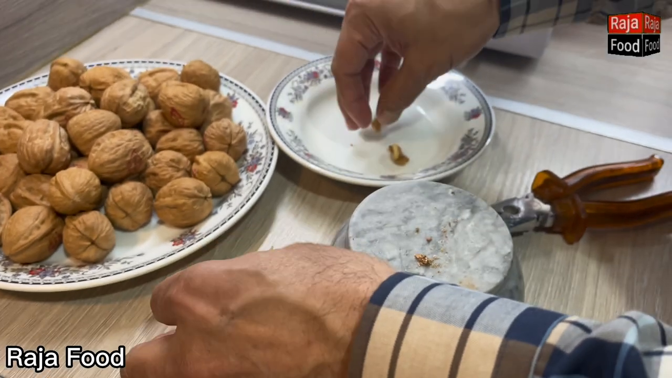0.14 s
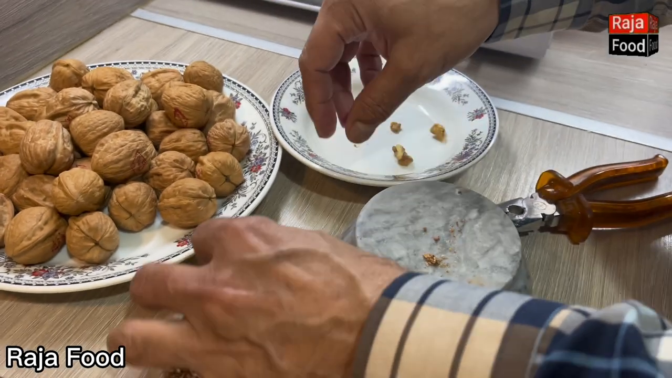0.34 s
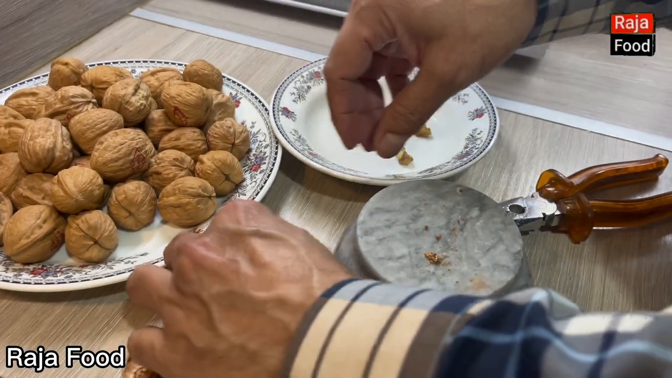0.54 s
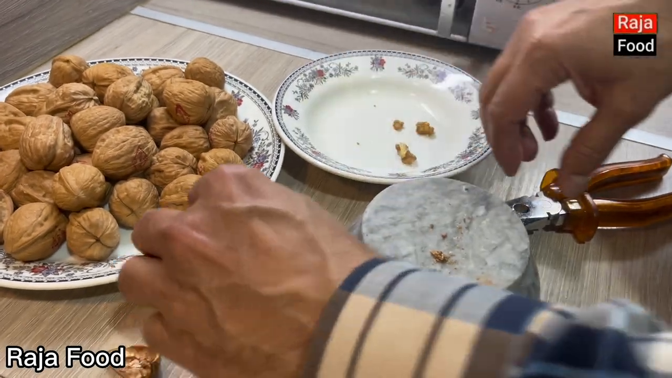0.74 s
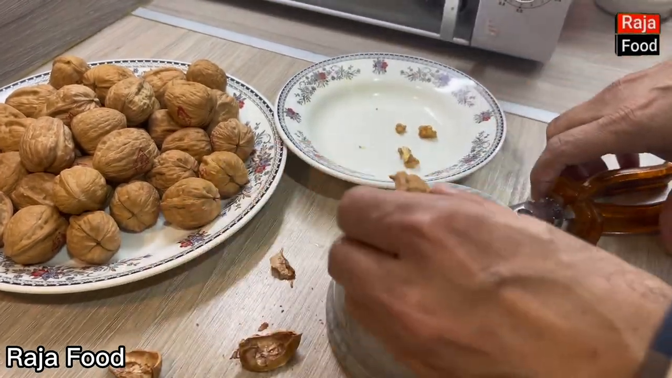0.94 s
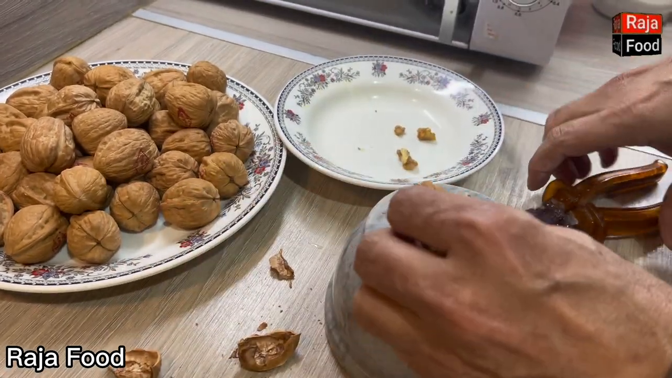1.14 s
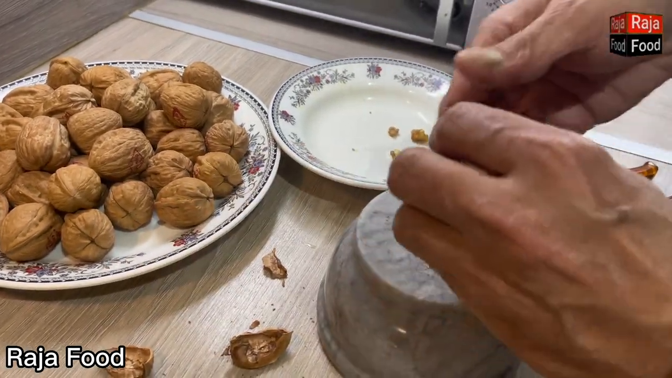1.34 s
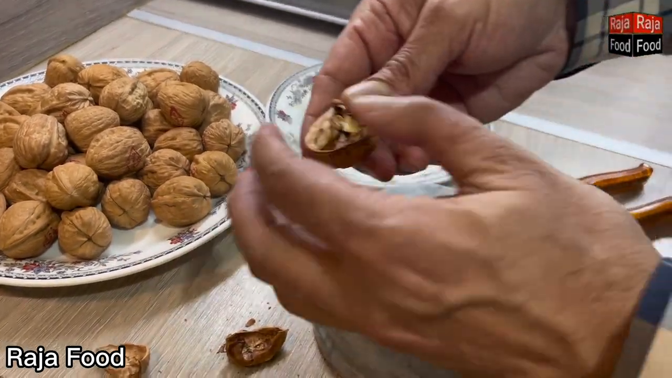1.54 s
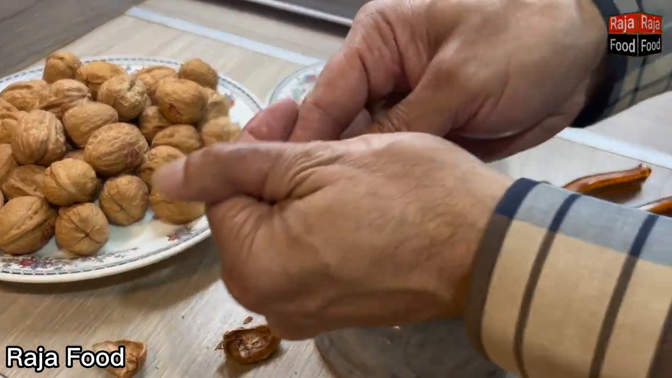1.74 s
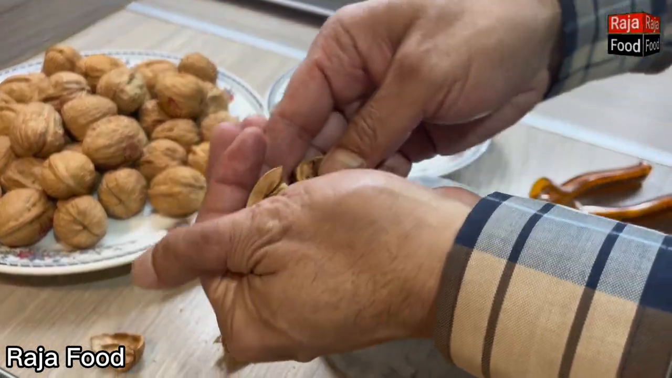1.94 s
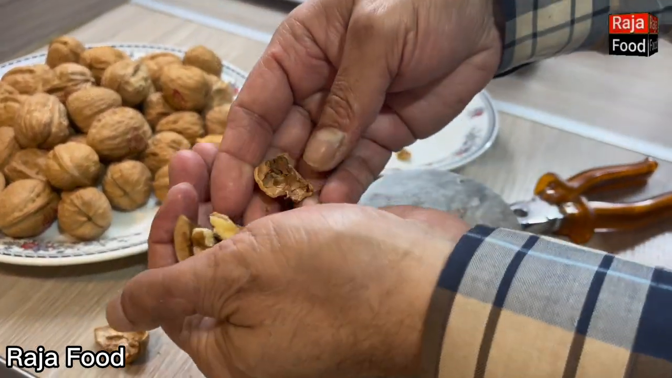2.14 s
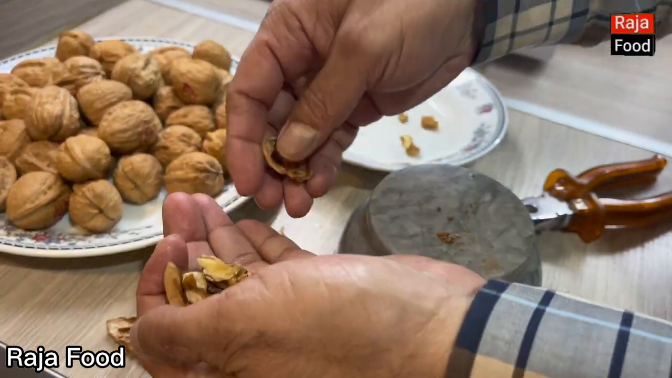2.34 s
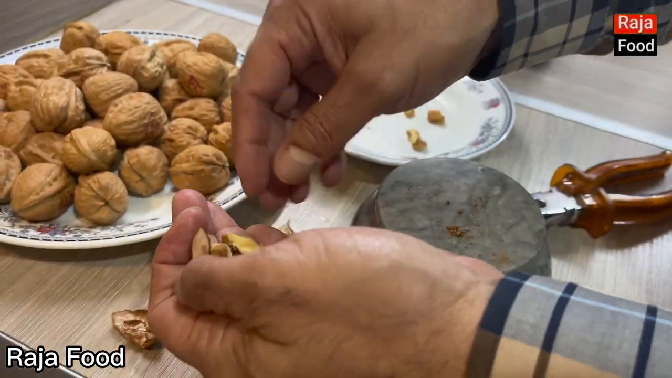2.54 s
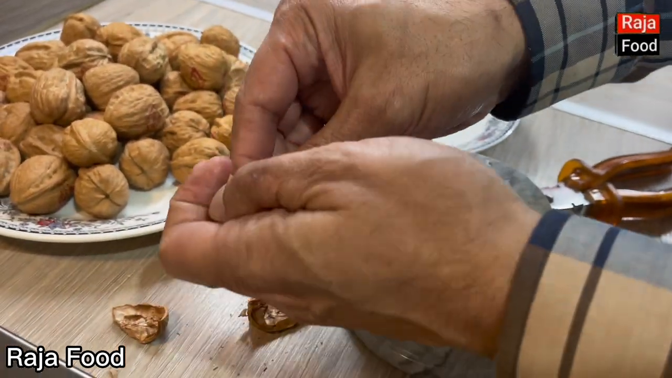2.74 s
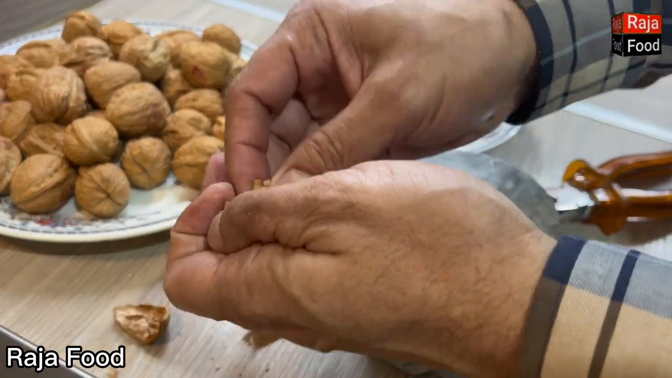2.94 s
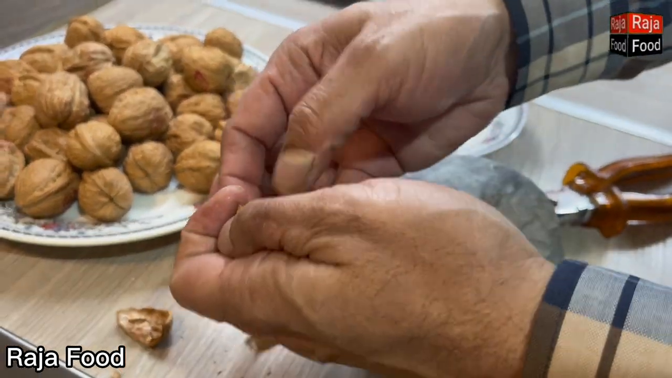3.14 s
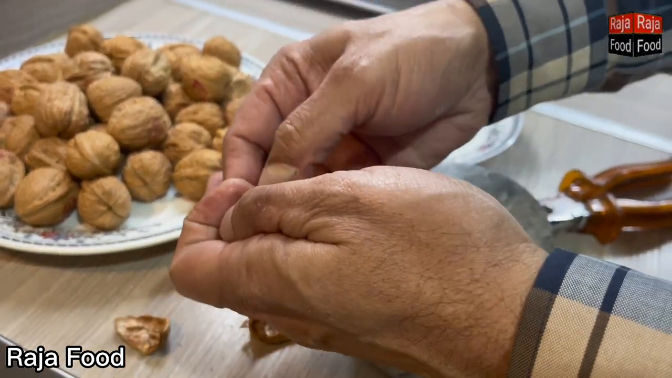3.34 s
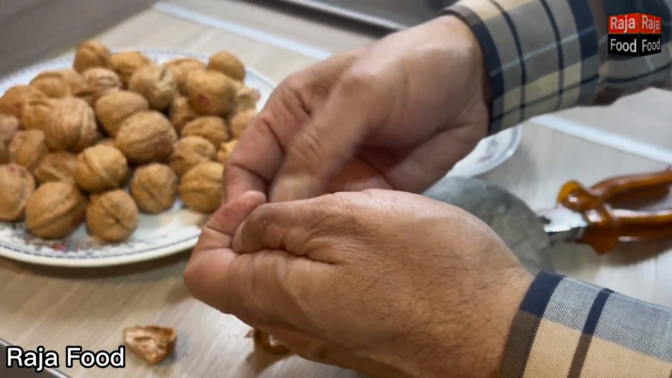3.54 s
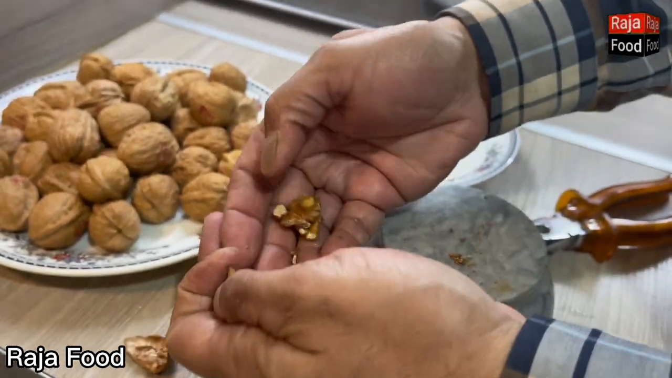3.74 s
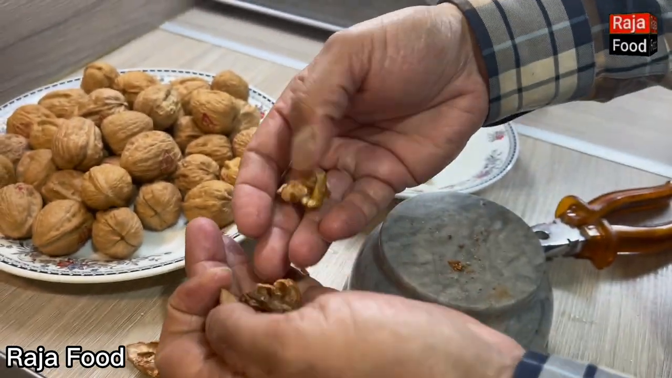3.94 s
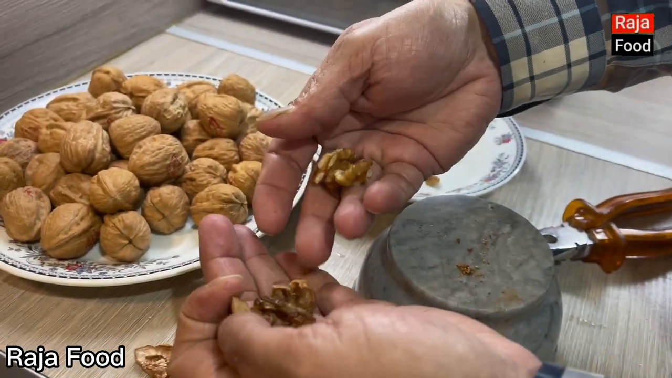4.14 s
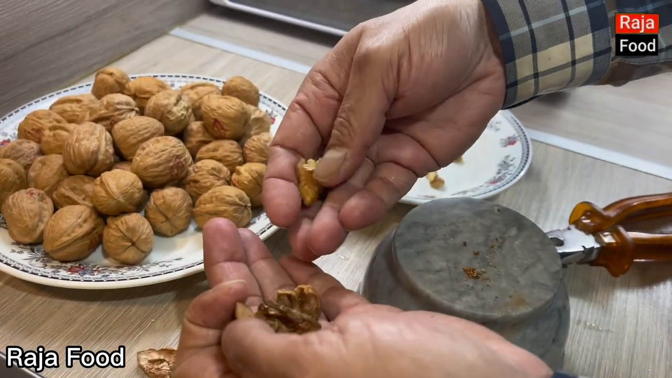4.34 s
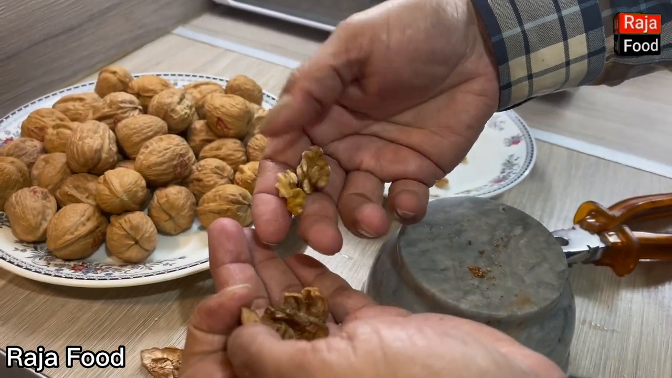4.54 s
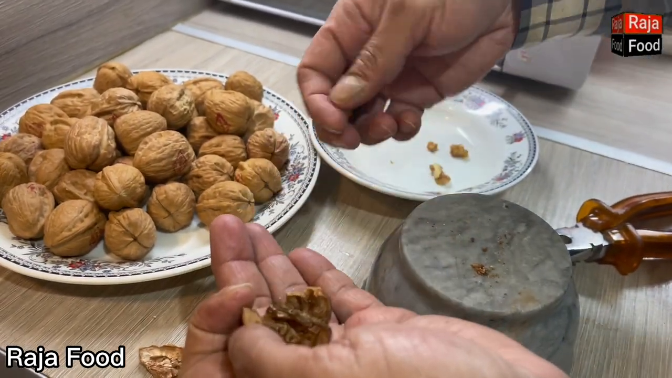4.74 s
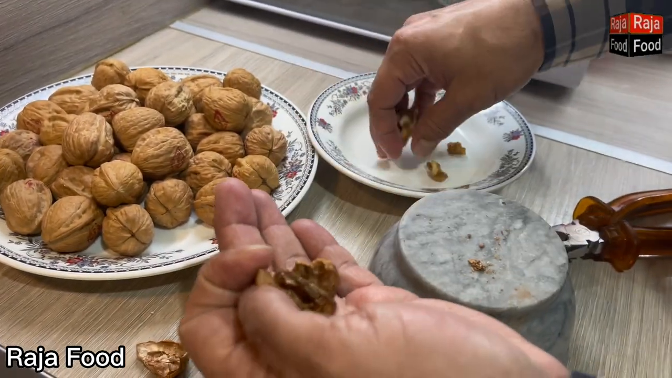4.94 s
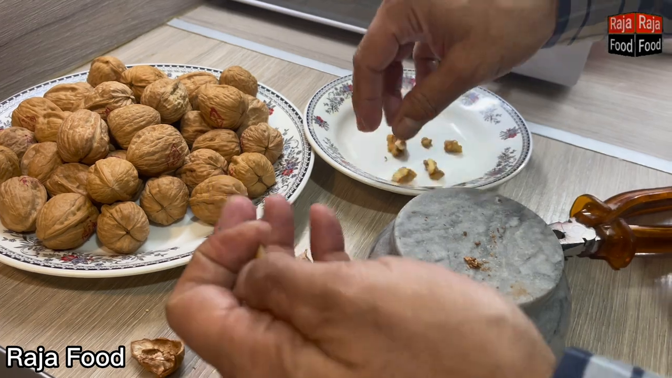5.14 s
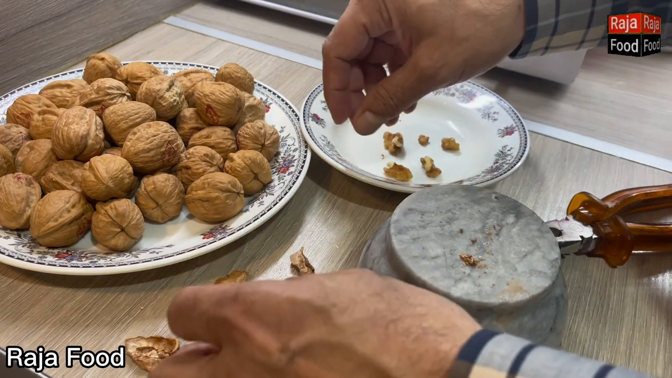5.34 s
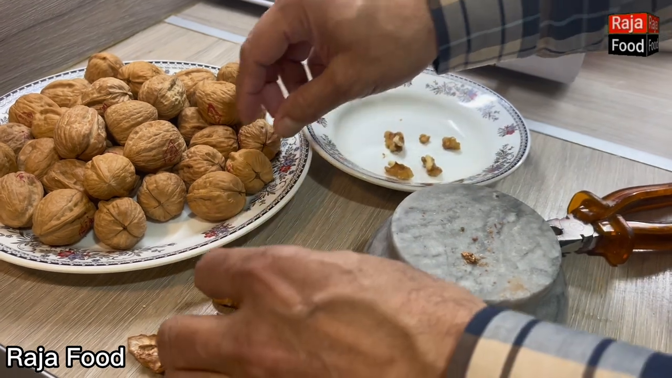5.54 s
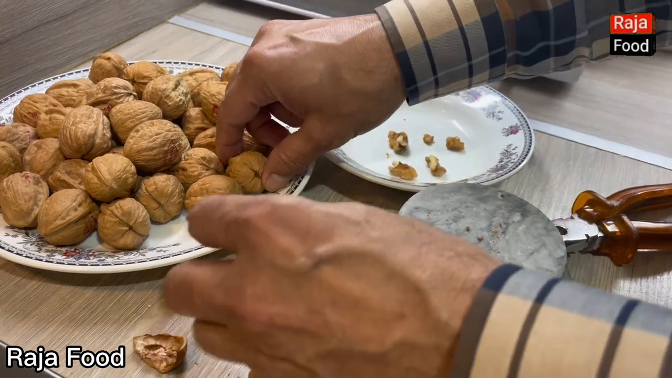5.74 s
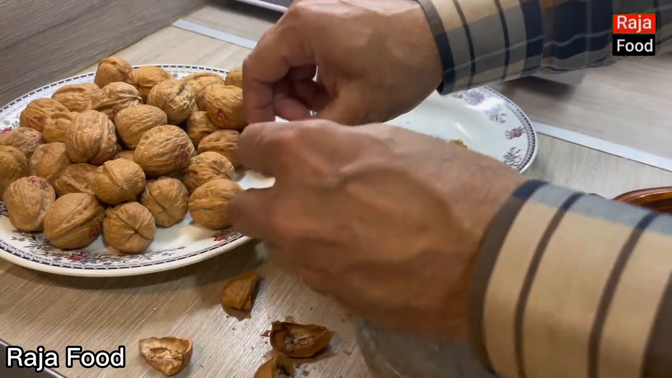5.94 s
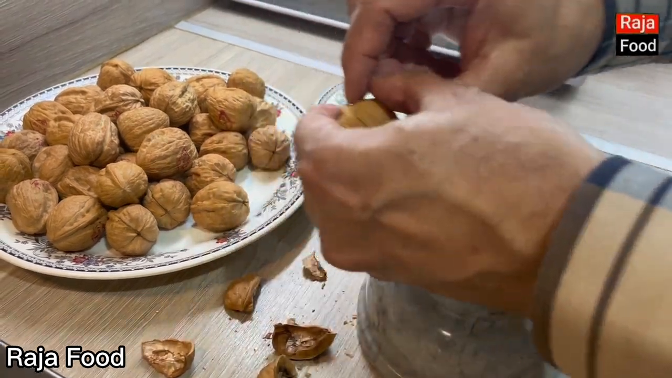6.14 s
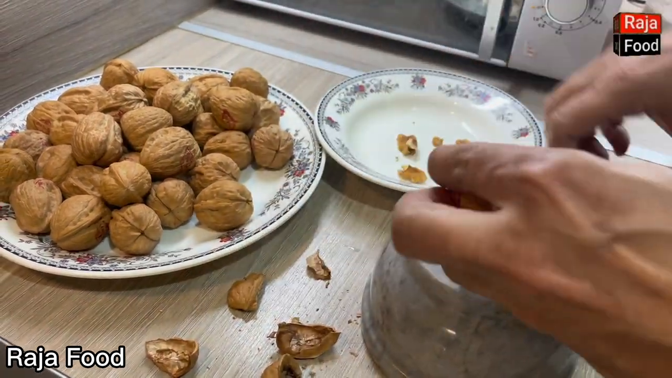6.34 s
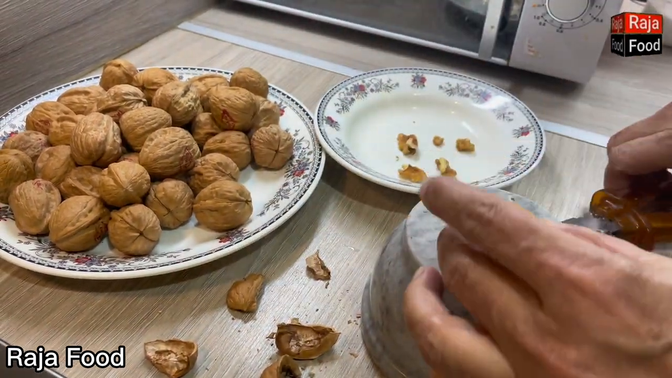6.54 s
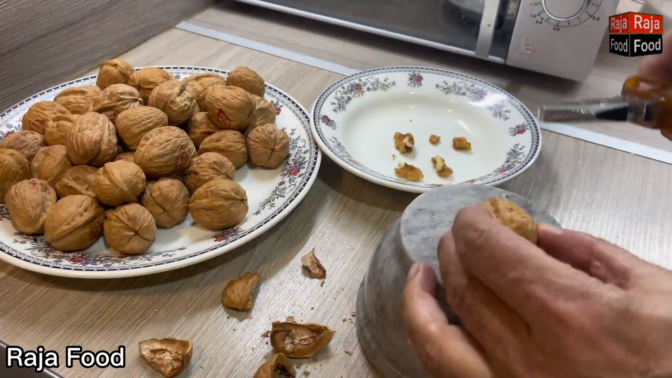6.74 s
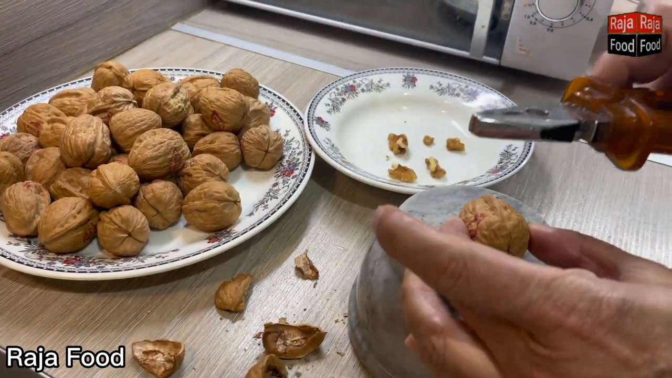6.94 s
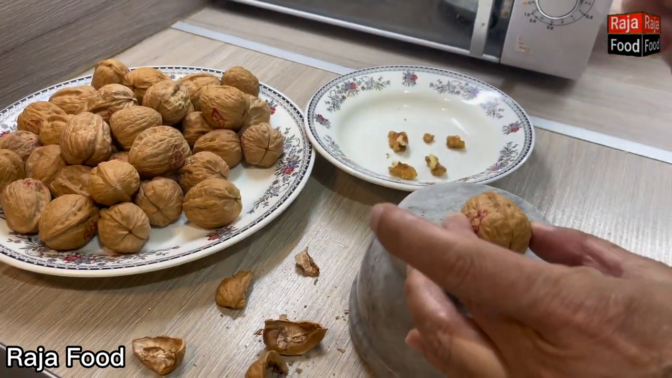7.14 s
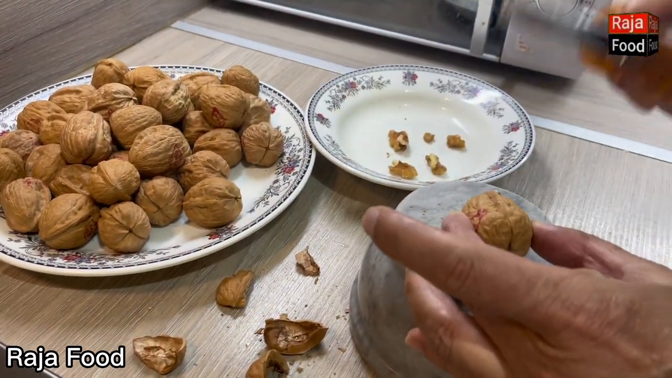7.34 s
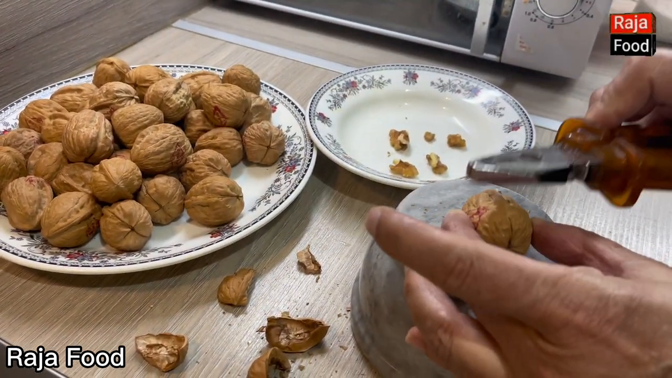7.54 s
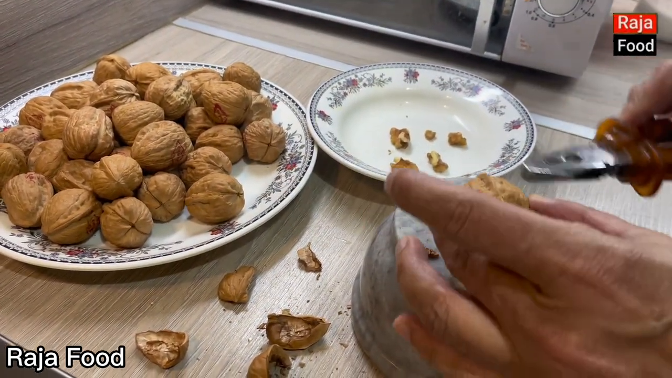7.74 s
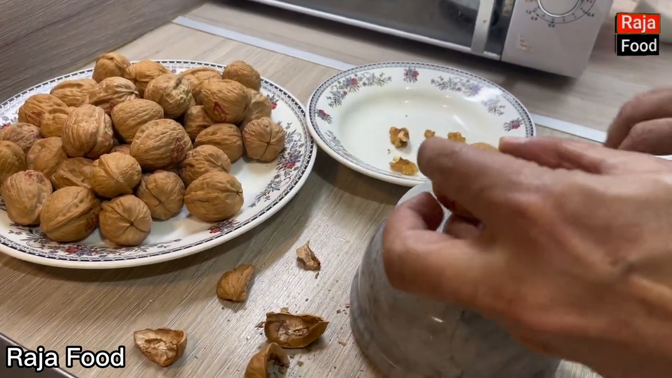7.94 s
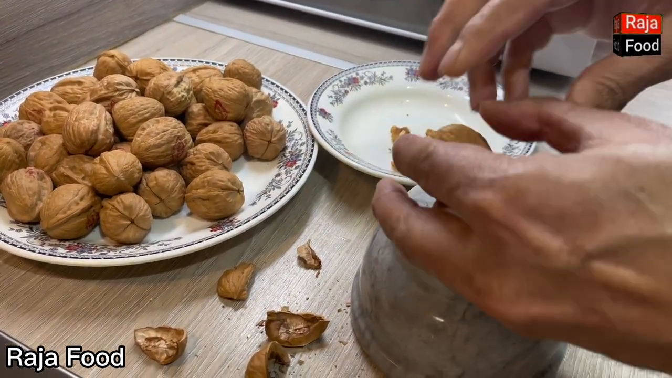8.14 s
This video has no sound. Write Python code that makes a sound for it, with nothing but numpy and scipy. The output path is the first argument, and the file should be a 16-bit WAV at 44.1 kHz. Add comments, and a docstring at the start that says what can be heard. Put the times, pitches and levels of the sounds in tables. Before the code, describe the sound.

Walnut kernels drop into a china plate, shell bits clatter, fingers snap shells quietly, then pliers knock a nut hard on stone with sharp cracks.

```python
"""A kitchen counter: walnuts are knocked open with pliers on an upturned stone mortar.
Each blow is noise bursts driving counter and stone modes, the nut's hollow and a splintering crack; steel jaws ring.
Kernels drop into a china plate, shell pieces clatter onto the counter, fingers snap them, and soft rubs pass,
all as bursts through resonators; the shuffling is filtered noise. A china tink and a soft gliding tone join in.
Below hums a quiet room, of narrow-band noise."""
import sys
import numpy as np
from scipy import signal
from scipy.io import wavfile
from scipy.ndimage import uniform_filter1d

SR = 44100
rng = np.random.default_rng(int(sys.argv[2]) if len(sys.argv) > 2 else 0)


def output_pcm(signal):
    """Save a mono or channel-first signal as 16-bit PCM at the path in sys.argv[1].

    Samples are clipped to [-1, 1] before scaling.
    """
    pcm = np.clip(np.atleast_2d(signal).T, -1, 1) * 32767
    wavfile.write(sys.argv[1], SR, np.round(pcm).astype(np.int16))


N = 361179

# modes of the counter: (frequency [Hz], relative level [dB], t60 [s])
COUNTER_MODES = [(105, -9.5, 0.98), (143, -0.5, 0.12), (227.5, 5, 0.051), (274, -11.5, 0.084),
                 (337, 2.5, 0.037), (477, -5, 0.033)]
# modes of a shell piece: (frequency [Hz], relative level [dB], t60 [s])
SHELL_MODES = [(840, -4.5, 0.019), (1685, 7.5, 0.0011)]

LEAD_S, AFTER_S = 0.06, 0.3   # span of an event before and after its peak
KNOCK_PAN_DB = -0.5   # left-right, shared by nut and jaws


def from_db(db):
    """Logarithmic level: decibels become an amplitude ratio."""
    return 10 ** (np.asarray(db) / 20)


def rms_one(x):
    """Power normalisation: scale to an rms of 1."""
    return x / np.sqrt(np.mean(x ** 2) + 1e-20)


def in_time(rows):
    """Linear interpolation: table columns become sample-rate curves."""
    s, *columns = np.transpose(rows)
    return [np.interp(np.arange(N) / SR, s, column) for column in columns]


def cut(x, hz, kind):
    """Butterworth filtering: a second-order low- or high-pass."""
    return signal.sosfilt(signal.butter(2, hz, kind, fs=SR, output="sos"), x)


def band(x, low_hz, high_hz):
    """Butterworth filtering: a band-pass."""
    return cut(x, [low_hz, high_hz], "band")


def resonance(x, hz, width_hz):
    """Damped resonance: a pole pair with a gain of about 1 at its peak."""
    r = np.exp(-np.pi * width_hz / SR)
    poles = [1, -2 * r * np.cos(2 * np.pi * hz / SR), r * r]
    return signal.lfilter([(1 - r * r) / 2, 0, (r * r - 1) / 2], poles, x)


def ring(force, modes):
    """Modal superposition: a force excites every mode, with a new strength for each event and port."""
    out = 0
    for hz, level_db, t60 in modes:
        r = from_db(-60 / (t60 * SR))
        w = 2 * np.pi * hz / SR
        event_db, port_db = rng.normal(0, 2.5), rng.normal(0, 1.5, (2, 1))
        gain = from_db(level_db + event_db + port_db)
        poles = [1, -2 * r * np.cos(w), r * r]
        out = out + gain * signal.lfilter([np.sin(w) / 2, 0, -np.sin(w) / 2], poles, force) / w
    return out


def grains(length, alike, rough_db):
    """Partial coherence: uneven noise whose two ports share a part, heard first on the left."""
    lag = round(0.00025 * SR)   # seconds between the ports
    sizes = from_db(rough_db * np.minimum(rng.exponential(1, length + lag), 3))
    shared, left, right = rng.standard_normal((3, length + lag)) * sizes
    alike = np.clip(alike, 0, 1)
    common = np.array([shared[lag:], shared[:length]])
    separate = np.array([left[lag:], right[:length]])
    return np.sqrt(alike) * common + np.sqrt(1 - alike) * separate


def lumps(length, depth_db, every_s):
    """Random modulation: a gain wanders from step to step, so that noise comes in bunches."""
    steps = rng.standard_normal(length // 20 + 2)
    position = np.arange(length) / (every_s * SR)
    return from_db(depth_db * np.interp(position, np.arange(len(steps)), steps))


def peak_at(x, level_db, window_s):
    """Short-time power: scale so that the loudest windowed rms has this level."""
    power = uniform_filter1d(np.mean(x ** 2, axis=0), round(window_s * SR))
    return x * from_db(level_db) / np.sqrt(power.max() + 1e-30)


def add(out, s, sound, pan_db):
    """Linear superposition: mix a short sound in, its peak at s, with a left-right level difference."""
    start = round(s * SR) - round(LEAD_S * SR)
    stop = min(start + sound.shape[1], N)
    out[:, start:stop] += sound[:, :stop - start] * from_db([[pan_db / 2], [-pan_db / 2]])


def burst_time():
    """Time origin: seconds relative to the peak of the burst."""
    return np.arange(-round(LEAD_S * SR), round(AFTER_S * SR)) / SR


def base_thud(push, base):
    """Delayed modal response: the base answers late and dull, on the right later and louder."""
    thud = ring(grains(len(push), alike=0.81, rough_db=4.0) * push, base)
    thud = np.roll(cut(thud, 780, "low"), round(0.0028 * SR), axis=1)
    return np.array([thud[0] * from_db(-4), np.roll(thud[1], round(0.00037 * SR))])


def coloured_modes(modes, hz, level_db, note_s):
    """Resonant emphasis: the modes near the colour's centre are favoured and notes around it added."""
    coloured = [(f, db - 8.8 * abs(np.log2(f / hz)), t60) for f, db, t60 in modes]
    # a note inside a broad bloom
    coloured += [(hz, level_db, note_s), (hz * 0.75, level_db - 1.5, 0.0035)]
    # further notes near it, for a woody sound
    for octaves in np.linspace(-0.4, 0.4, 6) + rng.normal(0, 0.04, size=6):
        coloured.append((hz * 2 ** octaves, level_db - 4.0 - 24.0 * abs(octaves), note_s))
    return coloured


def bright_crack(burst, tilt_db, colour_hz):
    """Source and filter: a noise burst passes broad resonances, tilted in dB per octave."""
    # broad resonances of a crack: (frequency [Hz], width [Hz], relative level [dB])
    crack_bands = [(3750, 2600, -7.5), (5860, 3200, -0.5), (8730, 2100, 2.5), (11500, 4300, -2)]
    hiss = grains(len(burst), alike=0.31, rough_db=-5.5) * burst
    crack = 0
    for k, (hz, width_hz, level_db) in enumerate(crack_bands):
        gain = (-1) ** k * from_db(level_db + tilt_db * np.log2(hz / 5500))
        crack = crack + gain * resonance(hiss, hz, width_hz)
    if colour_hz:   # the crack is coloured too
        air = grains(len(burst), alike=0.14, rough_db=-4.0) * burst
        crack = crack + resonance(air, colour_hz, 1000)
    # brief ringing at chance pitches
    chance = sum(resonance(crack, hz, 280) for hz in rng.uniform(3000, 12000, size=6))
    return cut(crack + from_db(-4.5) * chance, 2600, "high")


def contact(base, modes, thud_db, ring_db, crack_db, swell_ms, t60_ms, tilt_db,
            colour_hz=None, colour_db=None, note_s=None, *, click):
    """Burst excitation: a noise burst swells before its peak and dies away, driving thud, body and crack."""
    t = burst_time()
    after, swell_ms = np.maximum(t, 0), max(swell_ms, 0.1)
    before = np.where(t < 0, 1 - np.exp(-swell_ms / 5.5), 1)   # a brief swell is also weak, then jumps
    swell = before * np.exp(np.minimum(t, 0) * 1000 / swell_ms)
    fall_db = -60000 * after / t60_ms
    tail = from_db(-12 - 60 * after / 0.16)   # the kitchen answers each event
    bunches = lumps(len(t), depth_db=2.5, every_s=0.0015)
    bunches[np.abs(t) < 0.0001] = click   # gain of a click at the peak

    push = swell ** 2 * (from_db(fall_db / 0.61) + 2.1 * tail)   # dies away before the crack
    thud = base_thud(push, base)

    force = swell * (from_db(fall_db / 1.36) * bunches + 1.6 * tail)
    if colour_hz:
        modes = coloured_modes(modes, colour_hz, colour_db, note_s)
    body = ring(grains(len(t), alike=0.021, rough_db=-2.5) * force, modes)
    body = cut(body, 4500 if colour_hz else 7000, "low")

    burst = swell * (from_db(fall_db) * bunches + tail)
    crack = bright_crack(burst, tilt_db, colour_hz)
    return peak_at(thud, thud_db, 0.00047) + peak_at(body, ring_db, 0.00077) + peak_at(crack, crack_db, 0.00061)


def chime(modes, level_db, swell_ms, force_ms):
    """Modal ringing: a short noise burst leaves metal or china ringing."""
    t = burst_time()
    touch = np.exp(np.minimum(t, 0) * 1000 / swell_ms) * from_db(-60000 * np.maximum(t, 0) / force_ms)
    force = grains(len(t), alike=0.14, rough_db=-4.0) * touch
    return peak_at(ring(force, modes), level_db, 0.0057)


def knocks():
    """Impact on coupled bodies: a blow excites counter, stone and the hollow of the nut."""
    # knocks on stone and counter: (time [s], thud [dB], ring [dB], crack [dB], hollow of the nut [Hz],
    # swell before the peak [ms], centre of the thud [Hz], crack tilt [dB per octave])
    blows = [(0.994, -28.5, -38.5, -32.5, 3415, 5.8, 220, -9.5),
             (1.129, -25.5, -29.5, -35, 690, 9.4, 245, -17.5),
             (1.178, -22, -15, -29.5, 870, 2.5, 330, -11.5), (1.203, -25.5, -24.5, -58, 770, 1.1, 260, 0),
             (1.235, -78, -36, -72.5, 822, 3.3, 260, -8), (6.464, -42, -39.5, -53.5, 844, 5, 262, -9.5),
             (6.59, -41, -32, -39, 3180, 10.1, 257, -9), (6.622, -23.5, -12.5, -29, 2183, 2.7, 406, 1),
             (6.626, -12.5, -14.5, -51, 784, 4, 306, 0), (7.058, -7.5, -14, -12, 637, 7.8, 330, -23),
             (7.28, -47, -17.5, -15, 3530, 5.6, 300, 0), (7.285, -39.5, -25.5, -15.5, 2484, 4.4, 308, 1.5),
             (7.29, -20, -49.5, -16.5, 3480, 1.4, 273, 1.5), (7.552, -48, -15.5, -18.5, 2820, 6.7, 199, 0),
             (7.557, -21.5, -21, -13, 2155, 0.91, 163.4, -5.5), (7.904, -13, -8, -18, 2094, 6.2, 340, -6.5),
             (7.972, -37, -35, -41.5, 1160, 1.2, 260, -1.5), (7.987, -13.5, -16.5, -40, 894, 0.66, 332, 3),
             (8.024, -19.5, -12, -18, 1115, 3, 309, -7), (8.069, -24.5, -24, -55, 680, 0.72, 264, -13),
             (8.105, -28.5, -26, -47.5, 860, 2.6, 300, -5)]
    # modes of the stone mortar: (frequency [Hz], relative level [dB], t60 [s])
    stone_modes = [(721, -2, 0.06), (775, 3.5, 0.055), (1160, -5, 0.04), (1580, 2, 0.035), (2145, -3, 0.03),
                   (2400, -8, 0.03)]
    out = np.zeros((2, N))
    for s, thud_db, ring_db, crack_db, hz, swell_ms, thud_hz, tilt_db in blows:
        t60_ms = 24.7 - 0.94 * ring_db   # the softer the ring, the longer the decay
        # counter modes fall off by 17.5 dB per octave from the centre of the thud
        base = [(f, db - 17.5 * abs(np.log2(f / thud_hz)), t60) for f, db, t60 in COUNTER_MODES]
        sound = contact(base, stone_modes, thud_db, ring_db, crack_db, swell_ms, t60_ms, tilt_db,
                        hz, colour_db=6.0, note_s=0.028, click=3.6)
        add(out, s, sound, KNOCK_PAN_DB)
    return out


def jaws():
    """Modal ringing: the steel jaws of the pliers ring when they strike."""
    # strikes of the jaws: (time [s], level [dB])
    strikes = [(7.059, -33), (7.28, -17)]
    # modes of the steel: (frequency [Hz], relative level [dB], t60 [s])
    steel_modes = [(2552, 0, .05), (3720, -7, .03), (4105, -7, .03), (6930, -8, .04), (7460, -8, .05)]
    out = np.zeros((2, N))
    for s, level_db in strikes:
        add(out, s, chime(steel_modes, level_db, swell_ms=6.1, force_ms=22), KNOCK_PAN_DB)
    return out


def drops():
    """Spectrum of an impact: kernels land and bounce in china, some waking the high modes more."""
    # landings and bounces: (time [s], thud [dB], ring [dB], crack [dB], swell before the peak [ms],
    # high modes [dB])
    landings = [(0.201, -43, -16.5, -33, 5, -5), (0.208, -40, -22, -27, 0.78, 1),
                (0.221, -54, -24.5, -22.5, 2.4, 4), (5.031, -33, -22, -36, 4.8, -6.5),
                (5.049, -38, -18, -43, 1.2, -19.5), (5.089, -39, -22, -43, 0.7, -6),
                (5.114, -37.5, -26.5, -58, 0.63, -24), (5.138, -38, -28, -63, 0.83, -11),
                (5.153, -46.5, -36, -31.5, 1.3, 0), (5.229, -47, -51, -72, 31, -3)]
    # modes of the plate: (frequency [Hz], relative level [dB], t60 [s])
    plate_modes = [(800, -18, .03), (1276, -12, .07), (1416, -6, .07), (1572, 0, .08), (1615, 0, .06),
                   (2210, -9, .04), (2460, -3, .04), (2960, -6, .04), (3690, -6, .04), (4660, -4, .03),
                   (5640, -4, .03)]
    # modes of the plate's foot: (frequency [Hz], relative level [dB], t60 [s])
    foot_modes = [(235, -9, .06), (280, -8, 0.25), (292, 0, .09), (345, -5, .08), (434, -8, .08)]
    out = np.zeros((2, N))
    for s, thud_db, ring_db, crack_db, swell_ms, high_db in landings:
        china = [(hz, db + high_db * (hz > 2000), t60) for hz, db, t60 in plate_modes]
        sound = contact(foot_modes, china, thud_db, ring_db, crack_db, swell_ms,
                        t60_ms=16, tilt_db=-4, click=4.6)
        add(out, s, sound, pan_db=-1.6)
    return out


def clatter():
    """Impact of light shells: emptied pieces strike the counter and sound their own hollows; the bright event
    at 0.281 s is a kernel bouncing in the plate, sounded the same way."""
    # pieces landing: (time [s], thud [dB], ring [dB], crack [dB], hollow of the piece [Hz],
    # swell before the peak [ms], decay t60 [ms])
    pieces = [(0.117, -50, -51, -65, 2030, 1.1, 75), (0.281, -48.5, -17.5, -23.5, 2650, 4.1, 53),
              (0.33, -55, -27.5, -20, 2190, 7.6, 110), (0.337, -47, -35, -21.5, 4470, 1.4, 95),
              (0.358, -68, -32, -17.5, 2440, 2.2, 28), (0.412, -54, -32, -29, 3190, 1.3, 140),
              (0.428, -68, -34, -29, 3050, 1.5, 34), (0.443, -56, -35, -35, 3220, 1.5, 41),
              (0.474, -52, -30.5, -26.5, 2730, 2, 63), (0.524, -70, -29, -35.5, 2140, 1.3, 355),
              (0.542, -45, -28.5, -19.5, 2030, 1.5, 60), (0.665, -51.5, -31, -29, 2480, 1.9, 76),
              (0.729, -51, -34, -37.5, 1680, 7.1, 27), (0.948, -45, -48.5, -56, 1910, 11, 240),
              (5.47, -50, -37, -42.5, 980, 3.9, 93), (5.499, -59, -38.5, -53, 4160, 1.5, 44),
              (5.54, -55, -31, -38.5, 2250, 5.6, 68), (5.593, -67, -35, -56, 1820, 4.4, 145),
              (5.613, -61, -40.5, -79, 1180, 1.5, 240), (5.695, -50, -31.5, -55, 2350, 2.2, 270),
              (5.716, -34.5, -31, -40.5, 2320, 9.7, 37), (5.749, -45, -30, -52, 2340, 2.9, 150),
              (5.807, -40.5, -36.5, -57, 2170, 1.7, 460), (5.834, -42, -26.5, -42, 2290, 25, 100),
              (5.855, -39, -43, -47, 2570, 2.9, 87), (5.912, -39.5, -25, -48, 2190, 6, 68),
              (5.952, -52, -36, -60, 2550, 4.4, 19), (6.011, -52.5, -52.5, -67, 603, 2.2, 140)]
    out = np.zeros((2, N))
    for s, thud_db, ring_db, crack_db, hz, swell_ms, t60_ms in pieces:
        tilt_db = -1.5 - 0.16 * (ring_db - crack_db)   # more ring than crack sounds duller
        sound = contact(COUNTER_MODES, SHELL_MODES, thud_db, ring_db, crack_db, swell_ms, t60_ms, tilt_db,
                        hz, colour_db=-9.5, note_s=0.022, click=3.4)
        add(out, s, sound, pan_db=-0.85)
    return out


def snaps():
    """Burst excitation: shell pieces snap and click between the fingers, each with its own hollow."""
    # snaps: (time [s], ring [dB], crack [dB], hollow of the piece [Hz], swell before the peak [ms],
    # decay t60 [ms], crack tilt [dB per octave])
    clicks = [(1.92, -64.5, -53.5, 2960, 3.5, 260, -10.5), (2.322, -75.5, -51, 6700, 1.04, 27, -2),
              (2.432, -80, -49, 6530, 1.9, 42, -1.5), (2.537, -31, -24, 4930, 5.2, 253, -7),
              (2.553, -48, -15, 5600, 7.8, 21, 7), (2.659, -41.5, -51, 3000, 1.6, 100, 5),
              (2.848, -53, -30, 4600, 11.8, 177, 4), (2.862, -51.5, -63, 4640, 2.5, 720, 5),
              (3.038, -56, -47.5, 4000, 12, 180, 10), (3.265, -72, -52.5, 2470, 1.4, 35, 0.5),
              (3.355, -56.5, -28, 4170, 7.3, 255, -4.5), (3.369, -44.5, -20.5, 4270, 6.6, 81, 5.5),
              (3.385, -56, -28, 3030, 3, 46, -9.5), (3.397, -57, -25.5, 4200, 2, 30, 10),
              (3.53, -85, -41, 3280, 1.1, 42, 49), (3.622, -48.5, -32, 4430, 8.8, 226, 4),
              (4.367, -58.5, -47.5, 3050, 6.4, 330, 46), (4.531, -47.5, -39, 3340, 8.8, 200, -8)]
    out = np.zeros((2, N))
    for s, ring_db, crack_db, hz, swell_ms, t60_ms, tilt_db in clicks:
        thud_db = ring_db - 20.5
        sound = contact(COUNTER_MODES, SHELL_MODES, thud_db, ring_db, crack_db, swell_ms, t60_ms, tilt_db,
                        hz, colour_db=-14.5, note_s=0.0023, click=5.25)
        add(out, s, sound, pan_db=-1.5)
    return out


def rubs():
    """Shaped noise: soft rubs, a rolling kernel and a swish, with a slow onset."""
    # soft sounds: (time [s], thud [dB], ring [dB], crack [dB], centre of the colour [Hz], decay t60 [ms])
    strokes = [(0.778, -81, -46.5, -53, 1700, 91), (1.447, -74, -53, -52.5, 3520, 340),
               (1.723, -64.5, -51.5, -52, 2650, 390), (1.787, -69, -53.5, -42, 2390, 110),
               (2.191, -72, -60.5, -55.5, 1937, 520), (2.251, -88, -58, -57, 1430, 150),
               (2.309, -72.5, -55.5, -69, 992, 55), (2.99, -55.5, -68, -85, 600, 350),
               (3.97, -47.5, -63.5, -88, 705, 240), (3.7, -56.5, -64, -87, 607, 330),
               (4.041, -82.5, -90, -56, 1980, 180), (4.271, -50.5, -60, -82, 800, 660),
               (4.661, -88, -57.5, -60, 2580, 120), (4.761, -69, -61.5, -61.5, 1016, 260),
               (5.19, -60, -55.5, -58.5, 1420, 870), (6.521, -44, -54.5, -74.5, 910, 2100),
               (6.999, -64.5, -58.5, -53, 950, 170)]
    out = np.zeros((2, N))
    for s, thud_db, ring_db, crack_db, hz, t60_ms in strokes:
        sound = contact(COUNTER_MODES, SHELL_MODES, thud_db, ring_db, crack_db, 23.6, t60_ms, 0,
                        hz, colour_db=-14.5, note_s=0.018, click=1.6)
        add(out, s, sound, pan_db=-2.0)
    return out


def tinks():
    """Modal ringing: a bright little tink, perhaps a nail on the china rim."""
    # tinks: (time [s], level [dB])
    touches = [(4.21, -40.5)]
    # modes of the rim: (frequency [Hz], relative level [dB], t60 [s])
    rim_modes = [(3990, -27, .08), (6900, -22, .07), (7590, -8, .07), (11050, -1, .09), (12250, 0, .08)]
    out = np.zeros((2, N))
    for s, level_db in touches:
        add(out, s, chime(rim_modes, level_db, swell_ms=1.6, force_ms=75), pan_db=-1.5)
    return out


def hands():
    """Friction noise: skin and shell crumbs rub in a dull rumble, a rustle and a fine hiss."""
    # hands moving among the shells: (time [s], fine hiss [dB], low rumble [dB])
    movement = [(0.0, -67, -81), (0.23, -68.5, -65), (0.39, -39.5, -49), (0.55, -49, -77), (0.75, -66, -72),
                (1.19, -71, -58.5), (1.53, -66, -81), (2.49, -76, -77.5), (2.74, -56.5, -66),
                (3.19, -73.5, -82), (3.6, -66.5, -73.5), (4.1, -71, -69), (4.42, -68, -80.5),
                (5.5, -74.5, -76.5), (5.72, -74.5, -64.5), (5.93, -78.5, -56.5), (6.11, -68.5, -66),
                (6.45, -64, -79.5), (6.66, -77.5, -67), (6.98, -65.5, -77.5), (7.14, -78, -54),
                (7.45, -74.5, -69), (7.65, -72.5, -65), (7.85, -83.5, -73.5), (8.1, -75.5, -48),
                (8.19, -67, -62.5)]
    hiss_db, low_db = in_time(movement)
    stir = lumps(N, depth_db=1.5, every_s=0.05)
    low = band(cut(grains(N, alike=0.082, rough_db=0.0), 110, "high"), 140, 650)
    low = low * lumps(N, depth_db=3.5, every_s=0.04)
    rustle = band(grains(N, alike=0.05, rough_db=-0.5), 750, 2300)
    rustle = rustle * stir * lumps(N, depth_db=2.5, every_s=0.01)
    fine = grains(N, alike=0.033, rough_db=-7.0) * stir
    hiss = band(fine, 2000, 15000) + from_db(-1.5) * resonance(fine, 10800, 1700)
    hiss = signal.sosfilt(signal.cheby2(8, 40, 12500, fs=SR, output="sos"), hiss)
    rustle_db = hiss_db - 6   # the rustle follows the hiss
    return from_db(low_db) * rms_one(low) + from_db(rustle_db) * rms_one(rustle) + from_db(hiss_db) * rms_one(hiss)


def slide():
    """Phase integration: a gliding near sine with a faint octave, perhaps a dish sliding on the counter."""
    # the soft tone: (time [s], frequency [Hz], level [dB])
    glide = [(0.54, 361, -66), (0.598, 341.5, -40.5), (0.764, 326, -43.5), (0.88, 367, -79)]
    hz, level_db = in_time(glide)
    t = np.arange(N) / SR
    phase = 2 * np.pi * np.cumsum(hz) / SR
    sounding = (t > glide[0][0]) & (t < glide[-1][0])
    wave = np.sin(phase) + from_db(-25.5) * np.sin(2 * phase)
    tone = np.sqrt(2) * from_db(level_db) * sounding * wave
    return tone * from_db([[0.7], [-0.7]])   # slightly to the left


def room():
    """Narrow-band noise: a deep rumble, and a hum that wavers since its band is narrow."""
    # room sound: (time [s], deep rumble [dB], hum near 95 Hz [dB])
    rumble = [(0.0, -68.5, -72.5), (0.43, -58, -59.5), (0.93, -69, -79), (1.16, -55.5, -55),
              (1.43, -71.5, -71.5), (4.24, -63.5, -69), (4.63, -63.5, -72.5), (5.5, -66.5, -69),
              (6.0, -59.5, -65), (6.4, -62, -67.5), (8.03, -53.5, -55), (8.19, -56, -64)]
    deep_db, hum_db = in_time(rumble)
    deep = band(grains(N, alike=0.62, rough_db=-6.0), 24, 57)
    hum = grains(N, alike=0.68, rough_db=6.0)
    for _ in range(2):   # two equal resonators in a row
        hum = resonance(hum, hz=95, width_hz=22)
    return from_db(deep_db) * rms_one(deep) + from_db(hum_db) * rms_one(hum)


def scene():
    """Linear superposition: every source summed at the two microphone ports."""
    struck = knocks() + jaws() + drops() + clatter()
    handled = snaps() + rubs() + tinks() + hands()
    return struck + handled + slide() + room()


def record(dry):
    """Saturation and band limiting: peaks are rounded, treble is weakened and the top is cut."""
    rounded = 1.1 * np.tanh(dry / 1.1)
    # at least 16 dB down from 13 kHz, then 70 dB more from 16.2 kHz
    shelf = signal.sosfilt(signal.cheby2(6, 16, 13000, fs=SR, output="sos"), rounded)
    return signal.sosfilt(signal.cheby2(26, 70, 16200, fs=SR, output="sos"), shelf)


dry = scene()
out = record(dry)
output_pcm(out)
```